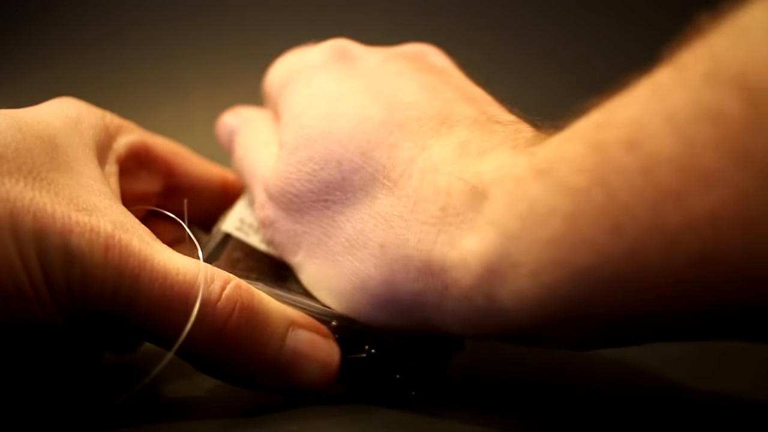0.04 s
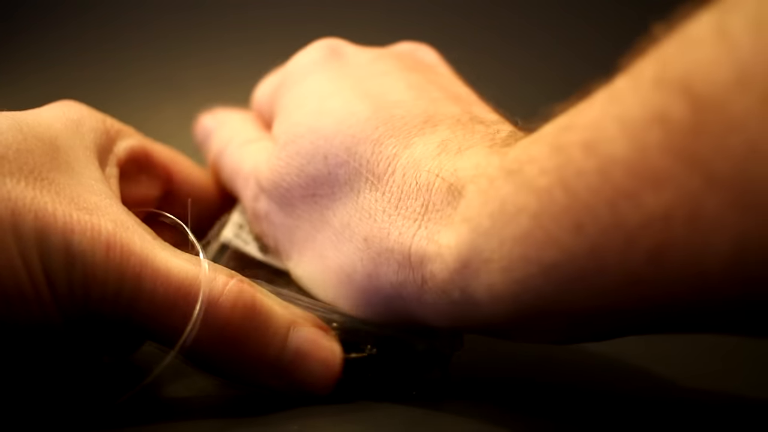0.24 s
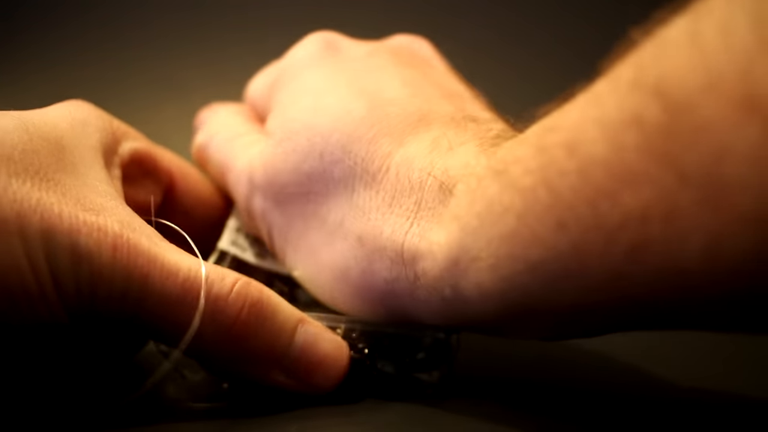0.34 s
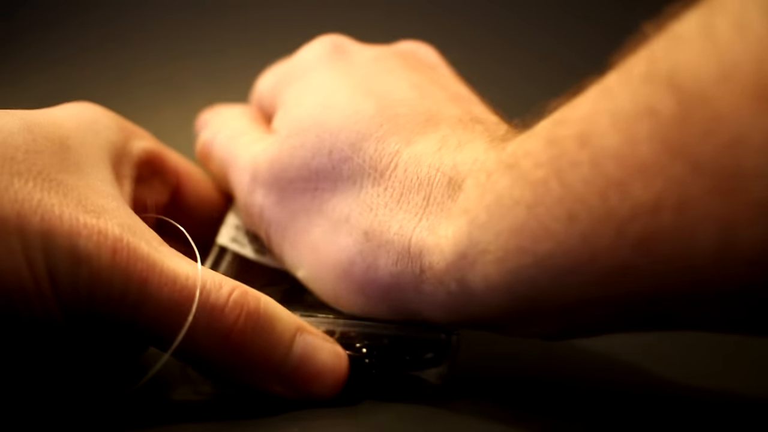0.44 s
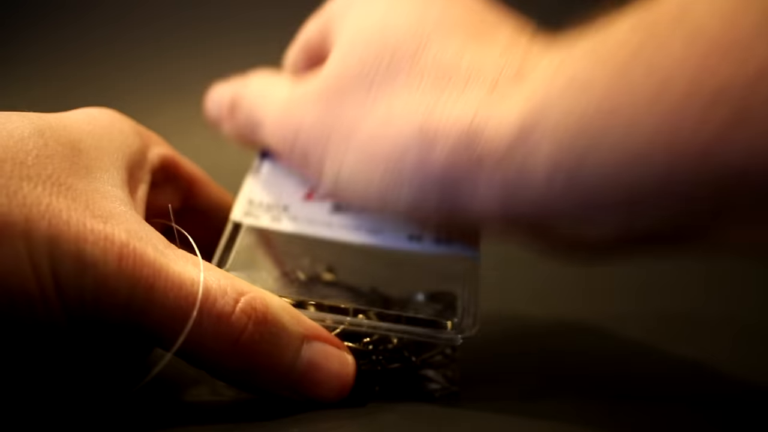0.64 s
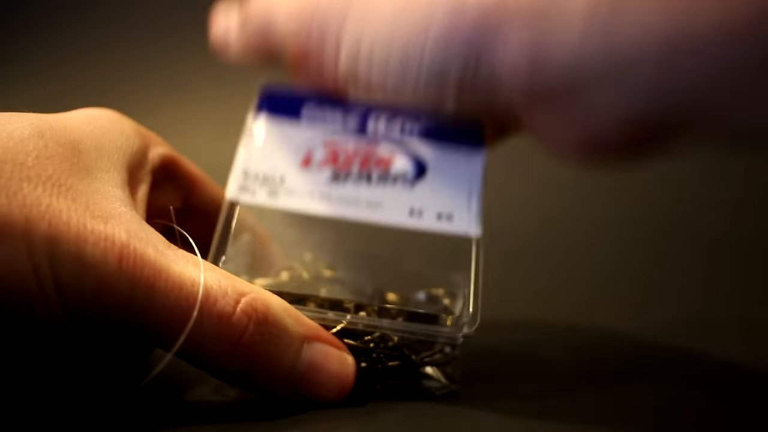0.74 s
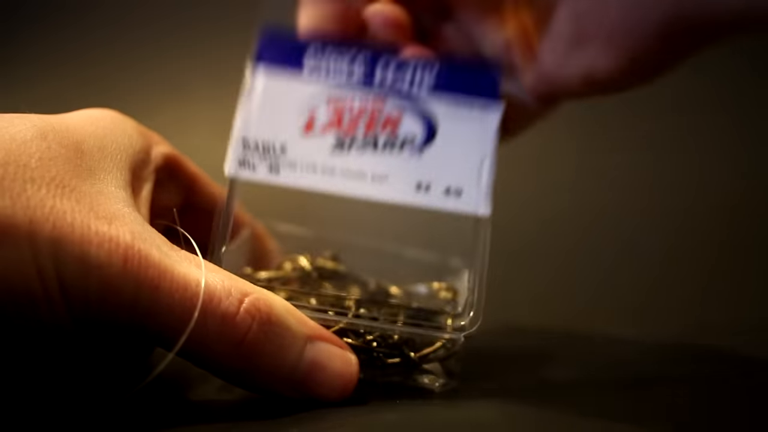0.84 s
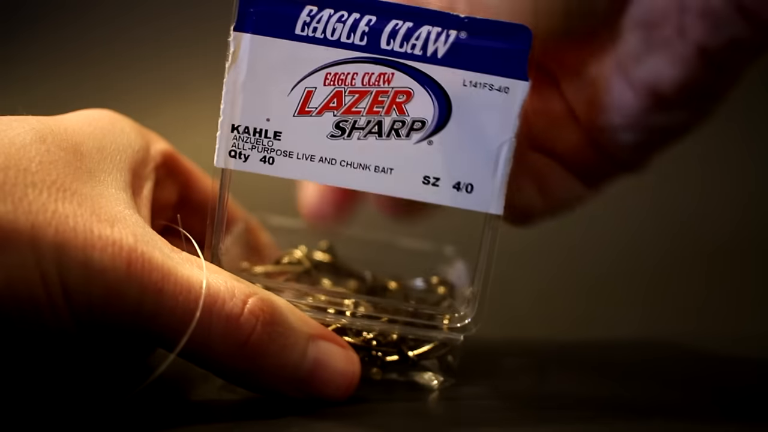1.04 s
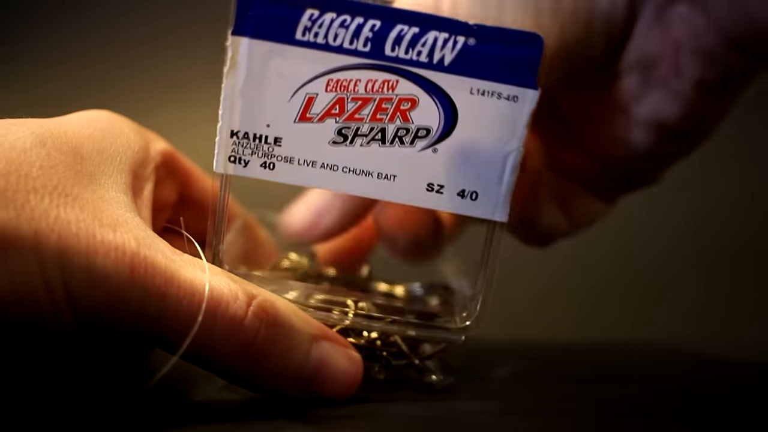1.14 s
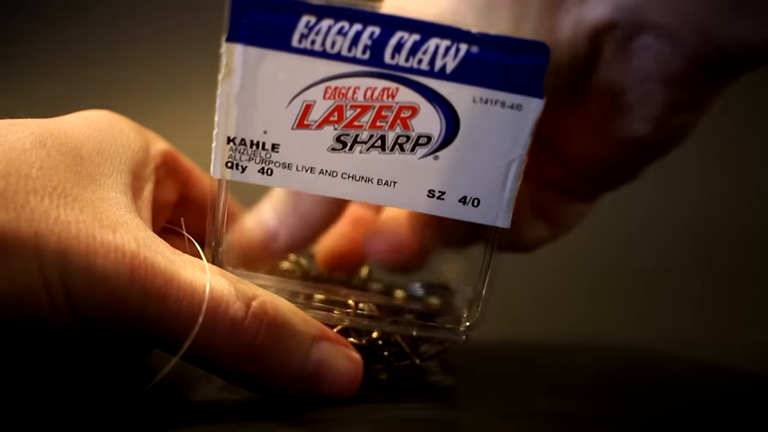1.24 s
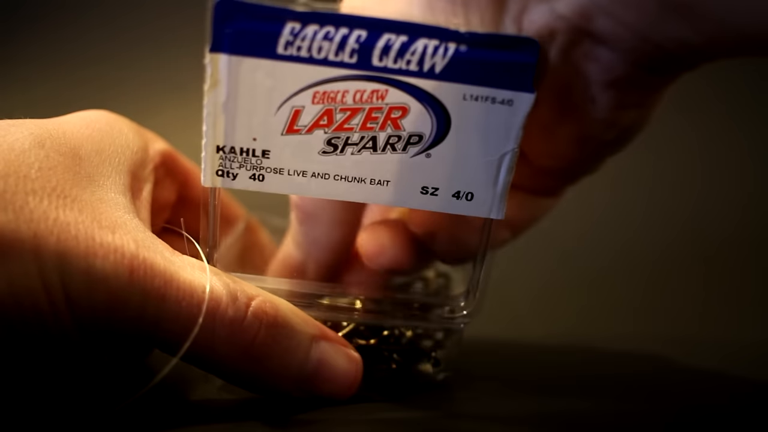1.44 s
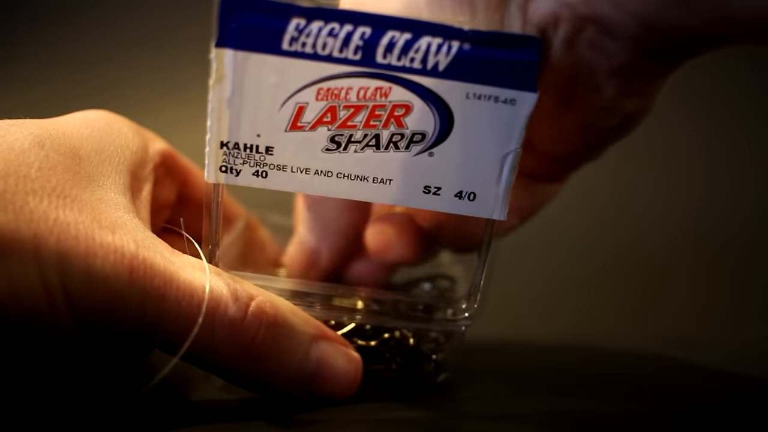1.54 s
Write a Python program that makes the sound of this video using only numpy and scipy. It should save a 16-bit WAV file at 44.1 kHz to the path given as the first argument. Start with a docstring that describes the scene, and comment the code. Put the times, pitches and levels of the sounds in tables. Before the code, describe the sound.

A thin plastic box is prised open with sharp snaps and short rubs. Fingers slide in, metal hooks tick faintly, and the plastic cracks loudly once more. Close microphone in a small, quiet room.

```python
"""Sharp snaps and short rubs: a thin plastic box of fish hooks is prised open, close by in a small room.
Its catches snap, the lid rubs free and knocks back, then fingers slide in and crack the wall once more.
Each snap rings the walls, the flexed panel and the air inside; rubbing is a stream of tiny slips.
The hollow of the box hums under the grip and the hooks tick as they shift."""
import sys
import numpy as np
from scipy import signal
from scipy.fft import rfft, irfft
from scipy.io import wavfile

SR = 44100
rng = np.random.default_rng(int(sys.argv[2]) if len(sys.argv) > 2 else 0)


def wav_out(sig):
    """Save sig, one row per channel (or a flat mono array), as 16-bit PCM at SR to the path in sys.argv[1]."""
    wavfile.write(sys.argv[1], SR, np.round(np.clip(np.atleast_2d(sig).T, -1, 1) * 32767).astype(np.int16))


N = 70560
TIME_S = np.arange(N) / SR
RING_S = TIME_S[:SR // 3]

# Background noise spectrum. Each row: frequency in Hz, relative level in dB.
FLOOR_SPECTRUM = [(25, -15), (60, -9), (140, 1.5), (300, -3.5), (500, -5.5), (650, -8), (1500, -7),
                  (4000, -13), (9000, -24), (16000, -31)]
# Hum of the hollow under the grip. Each row: time in seconds, level in dB.
HUM_LEVELS = [(0, -51.5), (.08, -44.5), (.15, -47.5), (.23, -39), (.295, -30), (.37, -61.5), (.46, -55.5),
              (.68, -45.5), (.82, -61), (.95, -56), (1.03, -47.5), (1.11, -54), (1.2, -48.5), (1.33, -53.5),
              (1.5, -60), (1.6, -49.5)]
# Air resonances driven by the grip. Each row: frequency in Hz, relative level in dB, width in Hz.
HUM_MODES = [(335, -0.5, 47), (519, -13, 47), (243, -13, 44)]
# Dull low bumps. Each row: start in seconds, level in dB, frequency in Hz, T60 in seconds.
LOW_BUMPS = [(0.317, -19, 59, 0.022), (0.667, -27, 235, 0.068), (0.71, -35, 209, 0.069),
             (0.786, -39.5, 170, 0.066), (0.867, -31.5, 146, 0.066), (0.936, -61, 187, 0.095),
             (1.057, -20, 181, 0.023), (1.399, -33, 68, 0.028), (1.578, -36, 237, 0.13),
             (1.594, -26, 270, 0.12)]
# Hooks touching. Each row: start in seconds, level in dB, pitch in Hz.
HOOK_TICKS = [(0.8875, -44.5, 6100), (0.9856, -26.5, 6520), (1.5510, -36, 6030)]
# Hook resonances. Each row: pitch ratio, relative level in dB, T60 in seconds.
WIRE_MODES = [(.72, -17, 0.0043), (1, 0.5, 0.0068), (1.08, -27, 0.0075), (1.4, -29, 0.0046)]
# Fingers rustling on the box. Each row: time in seconds, level in dB.
RUSTLE_LEVELS = [(0, -71), (.07, -51), (.15, -49), (.19, -53), (.28, -52), (.38, -45.5), (.455, -91),
                 (.48, -51.5), (.73, -55.5), (.81, -55), (.855, -59), (.89, -47), (.975, -65),
                 (1.01, -46.5), (1.11, -69), (1.26, -57), (1.49, -48), (1.6, -48)]
# Plastic and skin sliding. Each row: start and length in seconds, start level, end level and treble in dB.
RUB_STROKES = [(0.043, 0.017, -26, -64, -15), (0.224, 0.037, -50, -29.5, 1),
               (0.319, 0.023, -21.5, -28, 11.5), (0.507, 0.056, -28, -39, 0.5),
               (0.575, 0.02, -30, -27.5, 1.5), (0.599, 0.025, -49, -37, 0.5),
               (0.624, 0.032, -36.5, -39.5, 2.5), (0.672, 0.058, -49.5, -46, 9.5),
               (1.158, 0.073, -32.5, -39, -0.5), (1.343, 0.02, -39, -40.5, -8),
               (1.364, 0.0065, -32, -34, -7), (1.377, .017, -19.5, -26, -1.5),
               (1.41, 0.017, -26, -35.5, 3.5), (1.436, 0.041, -45.5, -42.5, 6.5),
               (1.505, 0.018, -48, -42, 4)]
# Spectrum of slips on plastic. Each row: frequency in Hz, relative level in dB.
SLIP_SPECTRUM = [(100, -35), (340, -6), (510, -2.5), (650, -16.5), (1000, -4), (1420, -1.5), (1700, 2),
                 (2300, 0), (3000, -3.5), (4200, -6), (5800, -14.5), (9000, -19.5), (16000, -38)]
# Wall resonances. Each row: frequency in Hz, relative level in dB, base T60 in seconds.
PLASTIC_MODES = [(778, -9.5, 0.02), (846, -15, 0.041), (967, -8.5, 0.021), (1153, -8, 0.028),
                 (1430, -2, 0.026), (1588, -18, .05), (1922, -10.5, 0.029), (2424, -4.5, 0.012),
                 (2950, -10.5, 0.017), (3280, -9.5, 0.0084), (3958, -7, 0.011), (4540, -14, 0.0047),
                 (6440, -46, 0.0036), (8170, -15, 0.0086), (11100, -39, 0.0024)]
# Air in the box, struck. Each row: frequency in Hz, relative level in dB, T60 in seconds.
HOLLOW_MODES = [(355, -16, .05), (475, -19, 0.038)]
# The plastic buckles or is knocked. Each row: start in seconds, level in dB, panel pitch in Hz,
# panel, hollow and treble gains in dB, T60 factor.
BOX_SNAPS = [ (0.0345, -25, 2470, -3, -15, -26, 0.42), (0.0455, -22, 2270, -1, 2, -16, 0.55),
             (0.0820, -47.5, 1040, 13.5, 22, -6, 1), (0.1215, -38.5, 487, 10.5, -10, -6, 2.3),
             (0.1475, -42, 1045, 9, 27.5, -12, 1.6), (0.2040, -31, 1210, 5.5, -4, -37, 0.69),
             (0.2125, -24, 920, 2.5, 14, -35, 2.3), (0.2245, -31.5, 1160, 5, -14, -19, 1.8),
             (0.2381, -1.5, 1096, -3.5, 3, -7, 1.165), (0.3169, -7, 997, 8, 8.5, -13, 0.89),
             (0.3185, -12, 1479, 8, -6, -1, 1.28), (0.3262, -17, 1550, 14.5, -24, -20, 0.98),
             (0.3370, -52, 1500, -16, -24, 18, 1), (0.472, -41, 1220, -13, -6, -23, 3),
             (0.504, -22.5, 4650, 6.5, -4, 12, 0.24), (0.5688, -16, 936, 4.5, 17.5, -16, 1.6),
             (0.5715, -25, 2800, 8.5, -15, 10, 1.4), (0.6200, -17.5, 968, 7, 13, -11, 1.17),
             (0.6225, -29, 1600, 10, -19, 4, 1), (0.6670, -27, 2230, -1.5, 10.5, -6, 0.84),
             (0.761, -42, 1230, 7, -17, 3.5, 1.2), (0.9395, -32.5, 1390, -7, -2, -6.5, 0.42),
             (0.9520, -26, 2320, 2.5, -26, -16, 0.43), (1.0595, -29.5, 2410, 1.5, 12.5, -2.5, 1.15),
             (1.1610, -35, 1590, 2, -24, 6, 0.66), (1.1980, -43.5, 2000, 15, 3, 5, 0.96),
             (1.212, -43, 2240, 19.5, -6, 16, 0.4), (1.3365, -42, 2720, 12.5, -9, 0, 0.56),
             (1.3720, -28.5, 2020, 8, -10, 11, 0.59), (1.3974, -3.5, 2160, 4.5, -5, 4, 0.49),
             (1.3975, -19, 4240, 17.5, -34, 22, 0.24), (1.4062, -26, 3930, -2, 7, 9, 0.84),
             (1.4630, -38, 4140, 14, -10, 10, 0.3), (1.5422, -38, 1500, -21.5, -12, 8, 1.4)]
# Room tails. Each row: level in dB, T60 in seconds, low-pass in Hz, left-right likeness from 0 to 1.
ROOM_TAILS = [(-8.5, 0.069, 23000, 0.24), (-20, 0.23, 20000, 0.39)]


def from_db(db):
    """Decibels to gain."""
    return 10 ** (np.asarray(db) / 20)


def unit_rms(x):
    """Scale to RMS 1."""
    return x / np.sqrt(np.mean(x ** 2) + 1e-20)


def cut(x, hz, kind, order=2):
    """Butterworth low- or high-pass."""
    sos = signal.butter(order, np.clip(hz, 10, SR / 2 - 100), kind, fs=SR, output="sos")
    return signal.sosfilt(sos, x)


def shelf(x, hz, db):
    """Raise or lower everything above hz."""
    w, g = 2 * np.pi * hz, from_db(db / 2)
    b, a = signal.bilinear([g, w * np.sqrt(2 * g), w * w], [1 / g, w * np.sqrt(2 / g), w * w], SR)
    return signal.lfilter(b, a, x)


def colour(x, spectrum):
    """Minimum-phase filter with the given spectrum; output at RMS 1."""
    hz, db = np.transpose(spectrum)
    bins_hz = np.fft.rfftfreq(4096, 1 / SR) + 1
    gains = from_db(np.interp(np.log(bins_hz), np.log(hz), db))
    cepstrum = irfft(np.log(gains))
    causal = np.arange(len(cepstrum)) < len(cepstrum) // 2
    response = irfft(np.exp(rfft(2 * cepstrum * causal)))
    return unit_rms(signal.fftconvolve(x, response)[:N])


def envelope(points):
    """Gain along (seconds, dB) points."""
    return from_db(np.interp(TIME_S, *np.transpose(points)))


def decay(t60_s):
    """Exponential fall, 60 dB in t60_s."""
    return np.exp(-np.log(1000) * RING_S / t60_s)


def mode(hz, db, t60_s):
    """One struck resonance."""
    return from_db(db) * decay(t60_s) * np.sin(2 * np.pi * hz * RING_S)


def widen(side, db):
    """Stereo side signal: added left, subtracted right."""
    return from_db(db) * side * np.array([[1], [-1]])


def add(out, start_s, sound):
    """Mix a sound in at start_s."""
    i = int(start_s * SR)
    out[..., i:i + sound.shape[-1]] += sound[..., :N - i]


def noise_floor():
    """Quiet, steady, dull noise, wide in stereo."""
    mid, side = (colour(rng.standard_normal(N), FLOOR_SPECTRUM) for _ in range(2))
    return from_db(-53) * (mid + widen(side, db=-2.5))


def room(x, delay_s=0.0023):
    """Dense near reflections and a faint longer tail."""
    response = 0
    for db, t60_s, top_hz, likeness in ROOM_TAILS:
        mid, side = rng.standard_normal((2, len(RING_S))) * decay(t60_s) * (RING_S > delay_s)
        tail = np.sqrt(1 + likeness) * mid + np.sqrt(1 - likeness) * widen(side, db=0)
        tail = cut(tail / np.sqrt(2 * np.sum(mid ** 2)), top_hz, "low", order=1)
        response += from_db(db) * cut(tail, hz=650, kind="high", order=1)
    return signal.fftconvolve(x, response, axes=1)[:, :N]


def grip_hum():
    """The grip keeps the air in the box humming."""
    hum = 0
    for hz, db, width_hz in HUM_MODES:
        resonator = signal.iirpeak(hz, hz / width_hz, SR)
        hum += from_db(db) * unit_rms(signal.lfilter(*resonator, rng.standard_normal(N)))
    return envelope(HUM_LEVELS) * unit_rms(cut(hum, hz=612, kind="low", order=6))


def low_bumps(attack_s=0.0033):
    """Dull low bumps: handling knocks and short bass thuds under two loud snaps."""
    out = np.zeros(N)
    for start_s, db, hz, t60_s in LOW_BUMPS:
        add(out, start_s, mode(hz, db, t60_s) * (1 - np.exp(-RING_S / attack_s)))
    return out


def hooks():
    """Short, bright ticks of wire damped by the heap."""
    out = np.zeros(N)
    for start_s, db, hz in HOOK_TICKS:
        tick = sum(mode(hz * ratio, db + mode_db, t60_s) for ratio, mode_db, t60_s in WIRE_MODES)
        add(out, start_s, tick)
    return out


def friction(slips_per_s, spread_db, ring_db=-11, ring_t60_s=0.15):
    """Tiny random slips, coloured by the plastic and ringing its walls."""
    sizes = from_db(spread_db * np.minimum(rng.exponential(1, N), 4)) * rng.choice([-1, 1], N)
    slips = colour(sizes * (rng.random(N) < slips_per_s / SR), SLIP_SPECTRUM)
    walls = sum(from_db(db) * np.cos(2 * np.pi * hz * RING_S) for hz, db, _ in PLASTIC_MODES)
    ringing = unit_rms(signal.fftconvolve(slips, walls * decay(ring_t60_s))[:N])
    return unit_rms(slips + from_db(ring_db) * ringing)


def rubs(catch_depth_db=2, catch_top_hz=92, attack_s=0.006, release_s=0.0082):
    """Sliding strokes that catch and let go, over a light finger rustle."""
    catching = from_db(catch_depth_db * unit_rms(cut(rng.standard_normal(N), catch_top_hz, "low")))
    out = envelope(RUSTLE_LEVELS) * friction(slips_per_s=2200, spread_db=0)
    sliding = unit_rms(catching * friction(slips_per_s=5000, spread_db=1))
    for start_s, length_s, start_db, end_db, treble_db in RUB_STROKES:
        attack = np.clip((TIME_S - start_s) / attack_s, 0, 1)
        release = np.exp(-np.maximum(TIME_S - start_s - length_s, 0) / release_s)
        gain = envelope([(start_s, start_db), (start_s + length_s, end_db)])
        out += attack * release * gain * shelf(sliding, hz=5800, db=treble_db)
    return out


def wall_ring(t60_factor, tension_spread=0.02, strike_spread_db=2):
    """Struck wall modes; the grip retunes them a little for each snap."""
    out = 0
    for k, (hz, db, t60_s) in enumerate(PLASTIC_MODES):
        detune, strike_db = rng.standard_normal(2) * [tension_spread, strike_spread_db]
        ring = mode(hz * (1 + detune), db + strike_db, t60_s * t60_factor)
        polarity, lean = (-1) ** (k // 2), (-1) ** (k + 1)
        out += polarity * (ring + widen(lean * ring, db=-34))  # left and right face different walls
    return out


def crack(t60_factor, base_t60_s=0.009, low_hz=1200, top_hz=4040):
    """Brief noise burst as the plastic gives."""
    mid, side = rng.standard_normal((2, len(RING_S))) * decay(base_t60_s * t60_factor)
    burst = cut(mid + widen(side, db=-5), top_hz, "low", order=1)
    return from_db(1.5) * cut(burst, low_hz, "high")


def snaps(panel_base_t60_s=0.019):
    """Each snap rings the walls, the flexed panel and the air inside, with a crack on top."""
    out = np.zeros((2, N))
    for start_s, db, panel_hz, panel_db, hollow_db, treble_db, t60_factor in BOX_SNAPS:
        shell = shelf(wall_ring(t60_factor) + crack(t60_factor), hz=2770, db=treble_db)
        panel = mode(panel_hz, panel_db, panel_base_t60_s * t60_factor)
        air = from_db(hollow_db) * sum(mode(*row) for row in HOLLOW_MODES)
        add(out, start_s, from_db(db) * (shell + panel + air))
    return cut(out, hz=184, kind="high")  # a small box radiates little bass


def scene(pan_db=0.7):
    """The box slightly left, in the room, over the noise floor."""
    box = snaps() + rubs() + hooks() + grip_hum() + low_bumps()
    pan = from_db([[pan_db / 2], [-pan_db / 2]])
    return noise_floor() + pan * (box + room(box))


def record(dry, cutoff_hz=16300):
    """The loudest snaps clip; a steep low-pass cuts the top."""
    lowpass = signal.ellip(10, 0.1, 70, cutoff_hz, fs=SR, output="sos")
    return signal.sosfilt(lowpass, np.clip(dry, -1, 1))


dry = scene()
out = record(dry)
wav_out(out)
```